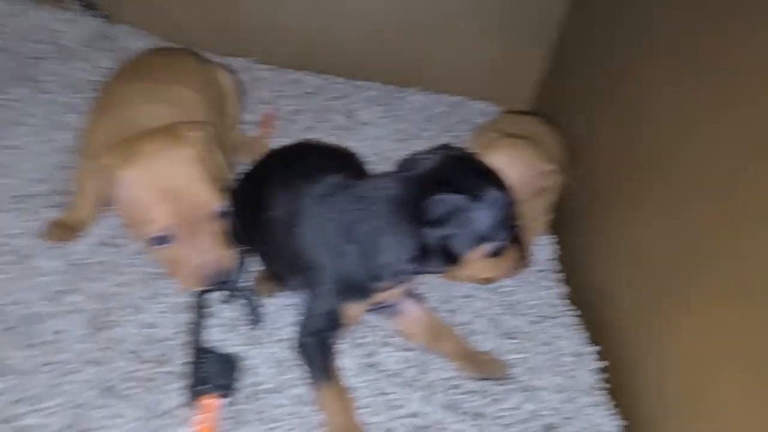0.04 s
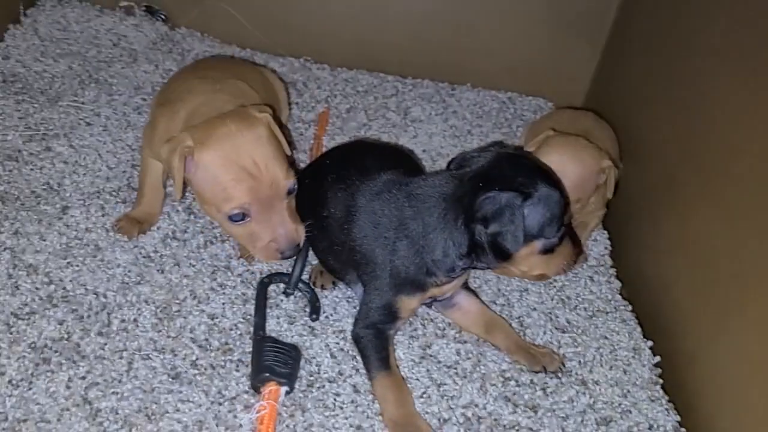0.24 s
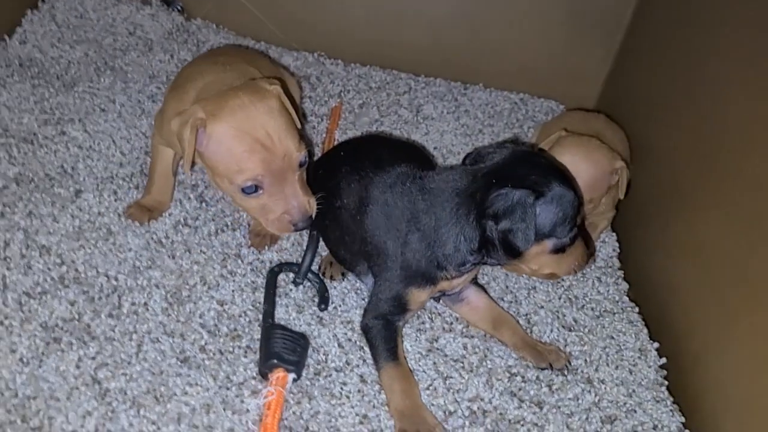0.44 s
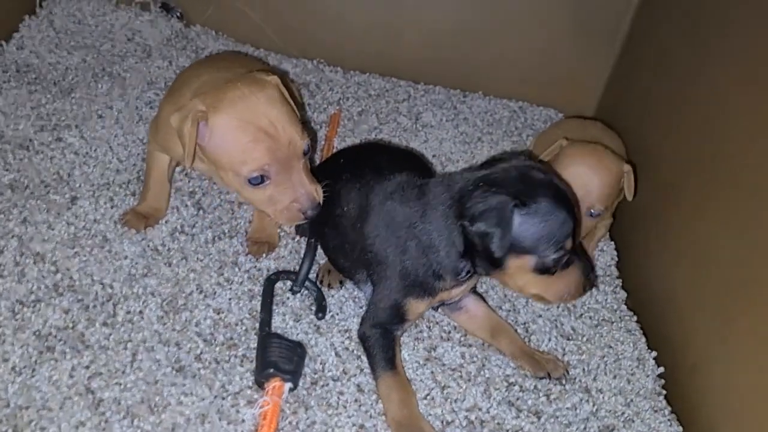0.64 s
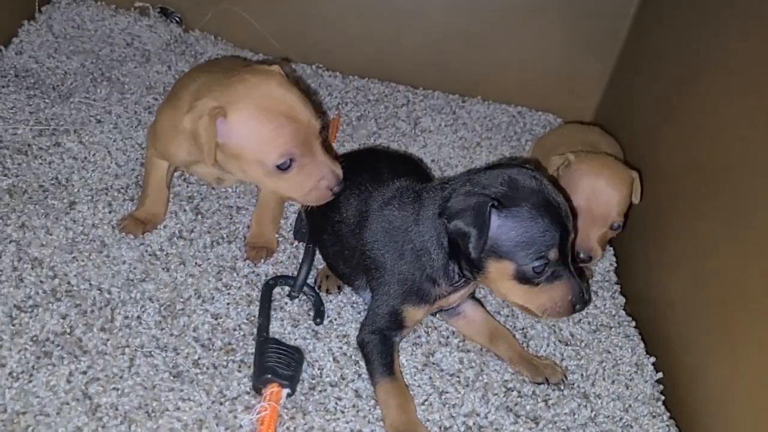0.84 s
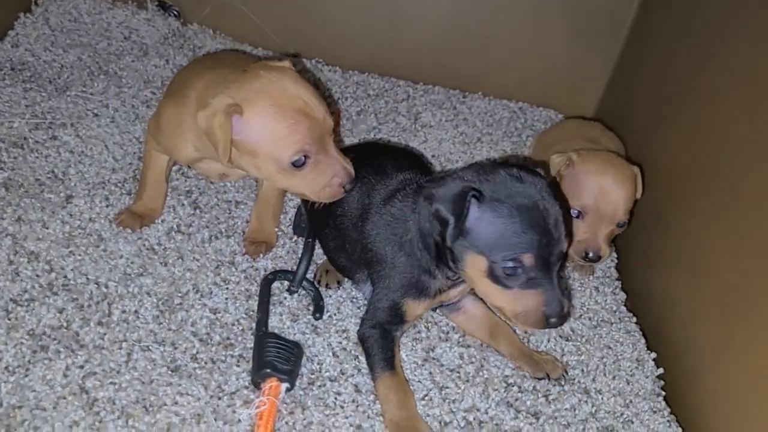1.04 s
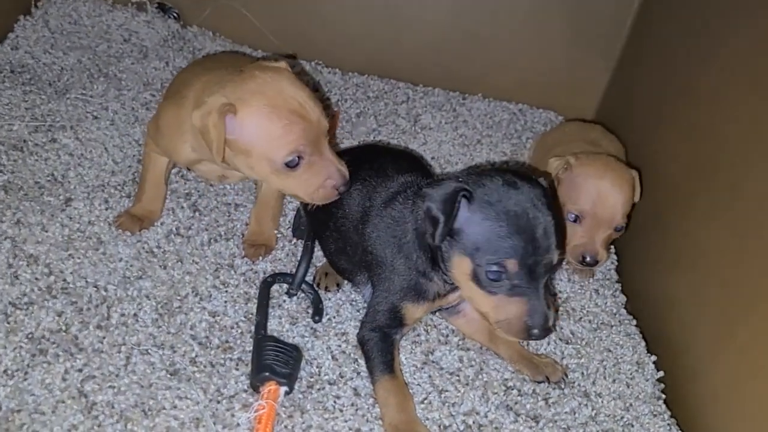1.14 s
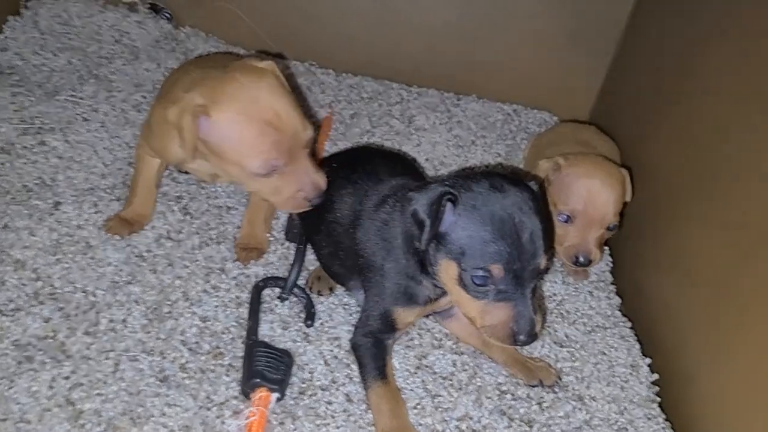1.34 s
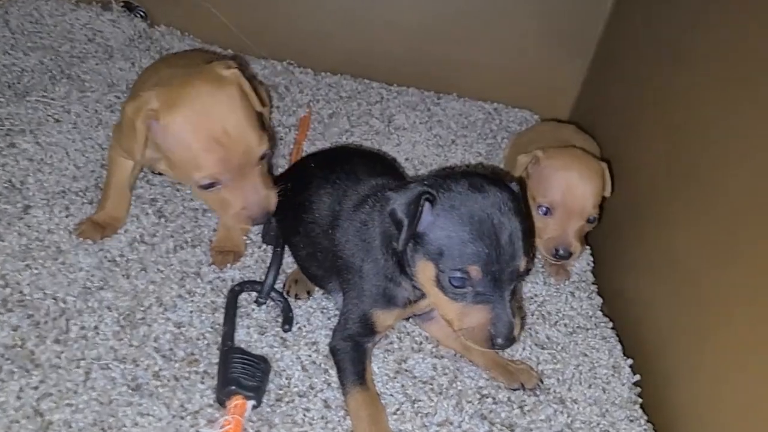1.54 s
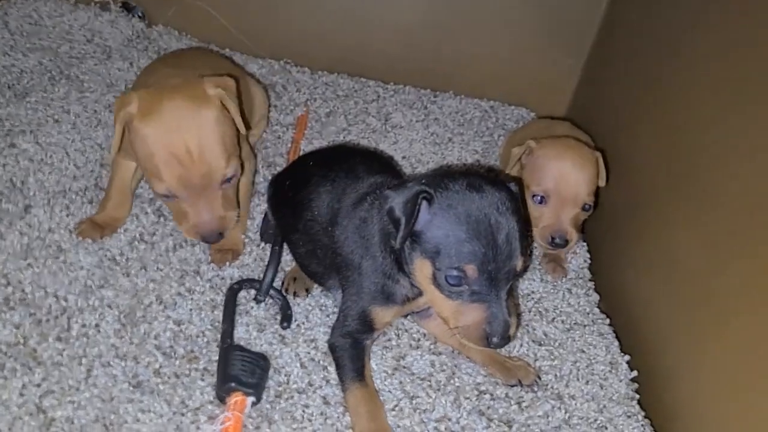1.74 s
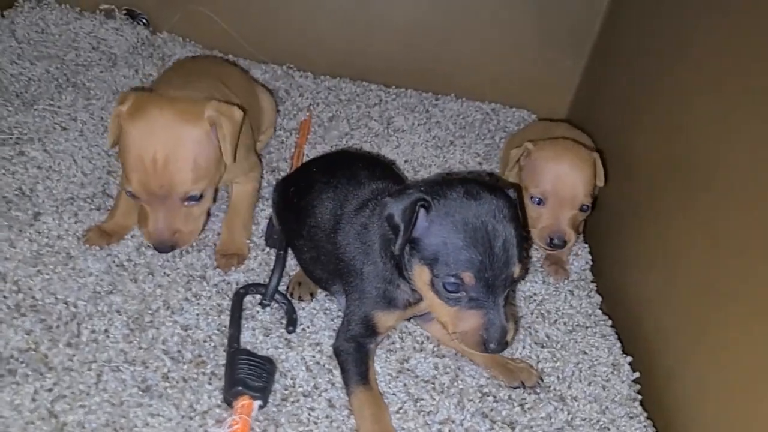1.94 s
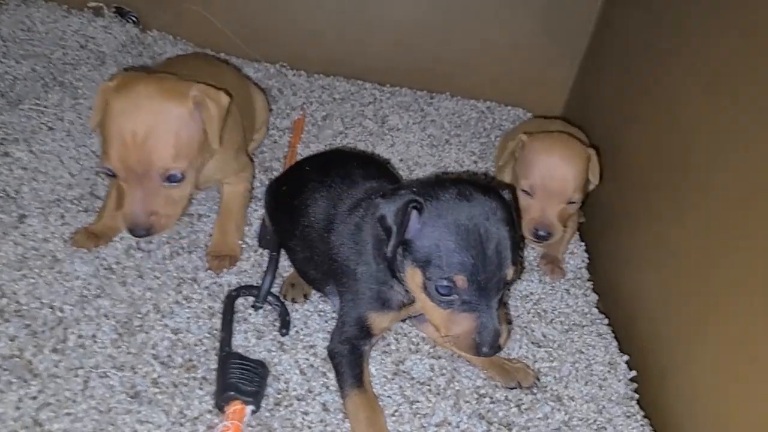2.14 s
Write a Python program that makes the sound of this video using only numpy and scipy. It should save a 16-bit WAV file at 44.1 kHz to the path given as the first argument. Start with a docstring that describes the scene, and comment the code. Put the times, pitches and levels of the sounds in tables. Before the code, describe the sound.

Young puppies squeal close by in a cardboard box, high cries overlapping and turning to rasping screams from 0.2 seconds. An arching yelp joins near 0.5, then a low whimper until about 1.1 as the squeals clear. A second yelp at 1.3 leads into the loudest scream at 1.6 and more whimpers until 2. One short squeal comes at 2.2. A faint hum and light room echo lie underneath.

```python
"""Indoors, young puppies tussle in a cardboard box, close to a camera's stereo microphone.
A low hum lies underneath from the start. High squeals come first, often two at once, breaking into
rasping screams as the vocal folds shake, then clearing. An arching yelp joins near half a second, then
a low whimper. A second yelp leads into more screams and whimpers, and one short squeal comes last.
The box walls and the room answer every cry."""
import sys
import numpy as np
from scipy import signal
from scipy.fft import rfft, irfft, next_fast_len
from scipy.io import wavfile
from scipy.ndimage import uniform_filter1d, minimum_filter1d, map_coordinates

SR = 44100
rng = np.random.default_rng(int(sys.argv[2]) if len(sys.argv) > 2 else 0)


def transcribe(signal):
    """Save signal, clipped to [-1, 1], as a 16-bit WAV file at the path in sys.argv[1]."""
    frames = np.atleast_2d(signal).T
    limited = np.clip(frames, -1, 1)
    pcm = np.round(limited * 32767).astype(np.int16)
    wavfile.write(sys.argv[1], SR, pcm)


N = 97020
T = np.arange(N) / SR
TOP_HZ = 15700
SQUEAL_JITTER, SLACK_JITTER = 0.05536, 0.066  # pitch scatter at full roughness: tight and slack folds


def amp(db):
    return 10 ** (np.asarray(db) / 20)


def unit_rms(x):
    return x / np.sqrt(np.mean(x ** 2) + 1e-20)


def along(points, hz):
    """Read (freq_hz, value) points on a log frequency axis."""
    freqs, values = np.transpose(points)
    return np.interp(np.log(hz + 1), np.log(freqs + 1), values)


def wobble(knots_per_s):
    """A smooth random curve."""
    return map_coordinates(rng.standard_normal(4096), [T * knots_per_s], mode="wrap")


def filtered(x, response):
    """x times a complex response of frequency."""
    size = next_fast_len(N + SR // 4)
    return irfft(rfft(x, size) * response(np.fft.rfftfreq(size, 1 / SR)), size)[..., :N]


def noise(spectrum):
    """Coloured noise of rms 1."""
    return unit_rms(filtered(rng.standard_normal(N), lambda hz: amp(along(spectrum, hz))))


def controls(rows, attack_s=0.0028, release_s=0.042):
    """The on-off gate of a cry, then one curve for each column after time_s."""
    times, *columns = np.transpose(rows)
    attack = np.clip(1 + (T - times[0]) / attack_s, 0, 1)
    release = np.clip(1 - (T - times[-1]) / release_s, 0, 1)
    return [attack * release] + [np.interp(T, times, column) for column in columns]


# Hush of the room at the microphone: freq_hz, density_db
HUSH_SPECTRUM = [(20, -22), (50, 2.5), (85, 2), (110, -0.5), (160, -4), (210, -14), (400, -23.5),
                 (1000, -16), (3000, -31), (6000, -38), (8500, -50.5), (16000, -54.5)]
def room_tone(hum_hz=83.7, hum_db=-44, hush_db=-48, side_db=-14.5):
    """A wavering low hum and a hush, nearly the same in both channels."""
    hum = np.sqrt(2) * np.sin(2 * np.pi * hum_hz * T + 0.29 * wobble(6.7))
    hum *= amp(hum_db + 2.5 * wobble(14.99))
    middle = noise(HUSH_SPECTRUM)
    side = amp(side_db) * noise(HUSH_SPECTRUM) * np.array([[1], [-1]])
    return hum + amp(hush_db) * (middle + side)


# Rasp in a puppy's throat: freq_hz, density_db
RASP_SPECTRUM = [(150, -38.5), (300, -26.5), (550, -28), (720, -1.5), (900, 6), (1300, -7.5), (1850, 4.5),
                 (2300, 0), (2700, -5), (3200, -11.5), (4000, -29), (5500, -37), (7500, -52), (10000, -48),
                 (11800, -38.5), (16000, -64.5)]
def rasp(phase, tilt_db):
    """One puff of noise to each cycle of the folds; a darker cry has more of it low down."""
    puffs = rng.standard_normal(N) * (1 + np.cos(phase))
    breath = unit_rms(filtered(puffs, lambda hz: amp(along(RASP_SPECTRUM, hz))))
    low = filtered(breath, lambda hz: 1 / (1 + (hz / 1350) ** 6))
    high = breath - low
    return low * amp(-0.042 * tilt_db) + high


def cry(throat, jitter, gate, pitch_hz, level_db, roughness, tilt_db, doubling, harmonics):
    """Vocal folds sound through the throat; roughness shakes their cycles and trades tone for rasp."""
    shake = jitter * roughness * wobble(330) + 0.0039 * wobble(70)  # fast scatter, slow waver
    phase = 2 * np.pi * np.cumsum(pitch_hz * (1 + shake)) / SR
    on = gate > 0
    multiples = np.arange(2, 2 * harmonics + 1)[:, None] / 2  # 1, 1.5, 2, ... times the pitch
    partial_hz = multiples * pitch_hz[on]
    brightness_db = tilt_db[on] * np.log2(np.minimum(multiples, 3))  # flat above the third harmonic
    gains = amp(along(throat, partial_hz) + brightness_db) * (partial_hz < TOP_HZ)
    gains *= np.where(multiples % 1, doubling[on], 1)
    partials = np.sin(multiples * phase[on] + rng.uniform(0, 2 * np.pi, multiples.shape))
    tone = np.zeros(N)
    tone[on] = (gains * partials).sum(0) / np.sqrt((gains ** 2).sum(0) / 2)
    voice = np.sqrt(1 - roughness ** 2) * tone + amp(-2) * roughness * rasp(phase, tilt_db)
    flutter_db = 4 * roughness * wobble(130)
    tremble_db = 1.41 * wobble(70)  # even a clear cry trembles
    return voice * gate * amp(level_db + flutter_db + tremble_db)


# Squeals close by, one list each: time_s, pitch_hz, level_db, roughness_0_to_1, tilt_db_per_octave
SQUEAL_CURVES = [
    [(0, 767, -26, 0.36, -5), (.02, 772, -36, 0.44, 1.5), (.06, 793.6, -45, 0.56, -7.5)],
    [(.174, 900, -32.5, .5, -7.5), (.2, 882, -22.5, 0.7, -7.5), (.245, 976, -14, 0.62, 17.5),
     (.28, 1099, -23, 0.45, 13.5), (.33, 1164, -27.5, 0.14, 6), (.38, 1120, -21, 0.5, 12)],
    [(.365, 928.7, -23, 0.58, 6), (.4, 890, -16, 0.72, -3), (.44, 785.5, -17.5, 0.83, -8.5),
     (.48, 733.7, -17.5, 0.61, 1), (.55, 735.8, -18, 0.44, 6), (.62, 818, -17, 0.64, -3),
     (.7, 828, -19, 0.47, -10.5), (.78, 735.7, -26.5, .6, -17), (.86, 832.6, -26.5, 0.5, -12.5)],
    [(.48, 900, -18, 0.68, -6), (.51, 901, -13, 0.62, 0.5), (.57, 885.9, -12.5, 0.49, -9),
     (.62, 925.6, -19, 0.63, -11.5), (.68, 1045, -23.5, 0.34, 11.5), (.74, 1030, -21, 0.57, 1.5),
     (.81, 1007, -16.5, 0.48, -1), (.87, 972, -29.5, 0.58, 17), (.94, 913.7, -26, 0.85, -2.5),
     (.985, 887.4, -21.5, 0.39, 6), (1.02, 902.5, -21.5, 0.45, 3.5), (1.075, 886, -21, 0.12, -5.5),
     (1.105, 869, -34.5, 0.11, 2.5), (1.13, 872, -28, 0, 3), (1.2, 858, -32.5, 0, -2),
     (1.28, 833, -46.5, 0.11, 3.5)],
    [(1.18, 830.5, -29, 0, 5), (1.21, 804.5, -28, 0, -2.5), (1.25, 785, -37, 0.1, 1)],
    [(1.285, 936, -48, .5, 12), (1.307, 979.7, -23.5, .55, 6.5), (1.33, 1026, -21.5, 0.51, 2),
     (1.37, 1081, -25.5, 0.7, 4.5), (1.41, 1038, -19.5, 0.54, -1.5), (1.5, 1034, -41.5, 0.3, -9)],
    [(1.56, 830, -32.5, .5, -5), (1.585, 906.5, -17, 0.7, -7), (1.6, 925, -16, 0.71, -9.5),
     (1.62, 915.3, -9, 0.23, -21.5), (1.65, 905.3, -12.5, 0.6, -9), (1.69, 911.2, -14, 0.67, -4),
     (1.73, 1000, -25.5, 0.73, 5), (1.79, 1051, -32, 0.45, 2.5), (1.825, 1061, -18.5, 0.46, -2.5),
     (1.885, 1128, -21.5, .3, -9), (1.92, 1163, -29.5, 0.65, 6), (1.97, 1155, -39.5, .34, 1.5)],
    [(2.175, 939, -45, .6, -7), (2.2, 963, -28.5, 0.53, -6.5)],
]
# Throat and mouth in a squeal: freq_hz, gain_db
SQUEAL_FORMANTS = [(500, -28), (850, 2.5), (1200, 5.5), (1550, 6), (1900, 10.5), (2400, 5), (2700, -11),
                   (3200, -14.5), (3600, -20), (4400, -32.5), (6200, -31.5), (7500, -45), (11500, -45.5),
                   (16000, -78)]
# Alternating cycles of the folds add partials between the harmonics: time_s, strength_0_to_1
PERIOD_DOUBLING = [(.63, 0.77), (.67, 1), (.71, 1), (.73, .01)]
def squeals():
    """High cries that swing between a clear tone and a scream."""
    doubling = np.interp(T, *np.transpose(PERIOD_DOUBLING))
    return sum(cry(SQUEAL_FORMANTS, SQUEAL_JITTER, *controls(rows), doubling, harmonics=14)
               for rows in SQUEAL_CURVES)


# Yelps close by, one list each: time_s, pitch_hz, level_db, roughness_0_to_1, tilt_db_per_octave
YELP_CURVES = [
    [(.45, 334.2, -34, .5, -3), (.5, 641.8, -20.5, 0.4, 11), (.55, 794.3, -14.5, 0.1, 6),
     (.595, 808.6, -15.5, 0.1, 4.5), (.635, 387, -32, 0.3, 0.5)],
    [(1.285, 376, -39.5, 0.53, -8.5), (1.32, 599.2, -23.5, .45, 1.5), (1.35, 775.4, -23.5, 0.5, 1),
     (1.385, 797.7, -22.5, 0.24, 2.5), (1.415, 604, -29, 0.58, 2), (1.455, 340, -33, 0.4, -3)],
]
# Throat and open mouth in a yelp: freq_hz, gain_db
YELP_FORMANTS = [(300, -12.5), (550, -10), (790, 0.5), (1150, 6), (1600, 1), (2400, -2.5), (2750, -10),
                 (3200, -11), (4000, -31.5), (5400, -36.5), (7500, -39), (10000, -46), (16000, -65.5)]
def yelps():
    """Throaty cries whose pitch arches as the mouth opens and shuts."""
    return sum(cry(YELP_FORMANTS, SLACK_JITTER, *controls(rows), doubling=np.zeros(N), harmonics=16)
               for rows in YELP_CURVES)


# Whimpers close by, one list each: time_s, pitch_hz, level_db, tilt_db_per_octave
WHIMPER_CURVES = [
    [(.635, 379.7, -31.5, 4), (.68, 292.4, -41.5, -4), (.74, 389.2, -20.5, 13.5), (.8, 499.7, -24, 5.5),
     (.85, 382, -31, 3), (.89, 308.2, -33.5, 5), (1.06, 298.4, -48, -1)],
    [(1.46, 342.2, -36, 2.5), (1.56, 405.7, -35, -1), (1.62, 454.3, -43, -8), (1.72, 438, -40.5, -13),
     (1.78, 435.2, -45.5, -11), (1.89, 592.5, -30, 8), (1.96, 611.5, -43.5, 21), (1.995, 661.6, -35.5, -7),
     (2.03, 683, -42.5, -10)],
    [(1.8, 258.7, -41, 2.5), (1.84, 392.6, -35, -12.5), (1.9, 650, -30, -9.5), (1.945, 563, -30.5, -18),
     (1.97, 350, -41.5, -18), (1.985, 280, -64, 10)],
]
# Throat and mouth in a whimper: freq_hz, gain_db
WHIMPER_FORMANTS = [(280, 1.5), (450, -13), (700, 3.5), (1100, -4), (1500, -3), (2100, -10.5), (3200, -38),
                    (4500, -52), (9000, -49), (16000, -70)]
def whimpers(roughness=0.4235):
    """Low, hoarse cries from slack folds, swooping up and down."""
    return sum(cry(WHIMPER_FORMANTS, SLACK_JITTER, gate, pitch_hz, level_db, roughness, tilt_db,
                   doubling=np.zeros(N), harmonics=10)
               for gate, pitch_hz, level_db, tilt_db in map(controls, WHIMPER_CURVES))


def ride_band(x, band, curve):
    """Raise and lower one band of x along a (time_s, gain_db) curve."""
    gain = amp(np.interp(T, *np.transpose(curve)))
    return x + filtered(x, band) * (gain - 1)


# Treble of the cries: time_s, gain_db
TREBLE_SWELLS = [(.02, 6.5), (.19, 2), (0.251, -14.5), (0.456, -9.5), (0.486, -1.5), (0.568, 0),
                 (.65, -13.5), (0.751, -5.5), (0.851, -2), (0.959, -15.5), (1.1, 2), (1.22, -12),
                 (1.29, -2.5), (1.379, 2.5), (1.479, -0.5), (1.56, -3.5), (1.619, 7), (1.71, -2),
                 (1.821, 1)]
# A narrow shrill band on top of that: time_s, gain_db
SHRILL_SWELLS = [(0.168, 11), (0.239, 1.5), (.42, 9.5), (.5, 2.5), (0.811, 1.5), (.855, 17), (.93, 0),
                 (1.561, 4.5), (1.629, 5.5), (1.7, 5), (1.77, 15), (1.88, 6)]
def puppies(treble_hz=2360, shrill_hz=5400, width_hz=420):
    """All the cries in the box; their treble and their shrill edge come and go."""
    voices = squeals() + yelps() + whimpers()
    voices = ride_band(voices, lambda hz: 1 - 1 / (1 + (hz / treble_hz) ** 20), TREBLE_SWELLS)
    return ride_band(voices, lambda hz: np.exp(-.5 * ((hz - shrill_hz) / width_hz) ** 2), SHRILL_SWELLS)


# Decay of the room around the box: freq_hz, t60_s
ROOM_DECAY = [(200, 0.077), (900, 0.27), (2200, 0.34), (6000, 0.61), (14000, 0.12)]
def box_and_room(x, left_lead_s=.00023, wall_span_s=.022, wall_db=0.5, room_db=-5):
    """Sound reaches the microphone's left port first; cardboard echoes and the room's tail follow."""
    direct = filtered(x, lambda hz: np.exp(1j * np.pi * hz * left_lead_s * np.array([[1], [-1]])))
    hz, age_s, spectra = signal.stft(rng.standard_normal((2, SR // 2)), SR, nperseg=256)
    decay = amp(-60 * age_s / along(ROOM_DECAY, hz)[:, None])
    tail = signal.istft(spectra * decay, SR, nperseg=256)[1]
    response = amp(room_db) * tail / np.linalg.norm(tail[0])
    for channel in response:
        delays = (rng.uniform(0.07784, 1, size=12) * wall_span_s * SR).astype(int)
        echoes = rng.standard_normal(len(delays)) * np.exp(-delays / (wall_span_s * SR))
        channel[delays] += amp(wall_db) * echoes / np.linalg.norm(echoes)
    return direct + signal.fftconvolve(x[None], response, axes=1)[:, :N]


# Balance at the microphone: freq_hz, right_over_left_db
STEREO_BALANCE = [(100, 1.8), (700, 0.6), (2500, 4.5), (5000, 6.5), (14000, 6)]
def scene():
    """Puppies at close range over the room tone, all louder on the right."""
    mix = box_and_room(puppies()) + room_tone()
    return filtered(mix, lambda hz: amp(along(STEREO_BALANCE, hz) * np.array([[-.5], [.5]])))


def record(dry, ceiling=1, reaction_s=0.0017):
    """The camera limits peaks over its ceiling and keeps nothing above its band limit."""
    window = int(reaction_s * SR)
    needed_gain = np.minimum(1, ceiling / (np.abs(dry).max(0) + 1e-9))
    gain = uniform_filter1d(minimum_filter1d(needed_gain, 2 * window), window)
    return filtered(dry * gain, lambda hz: hz < TOP_HZ)


dry = scene()
out = record(dry)
transcribe(out)
```